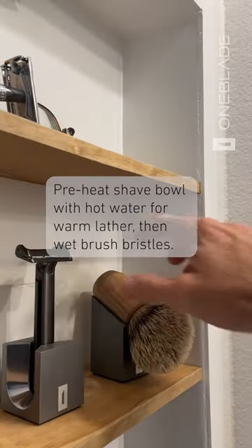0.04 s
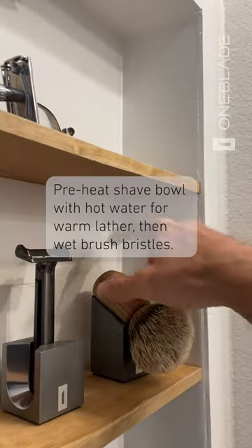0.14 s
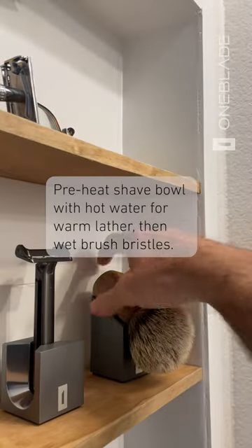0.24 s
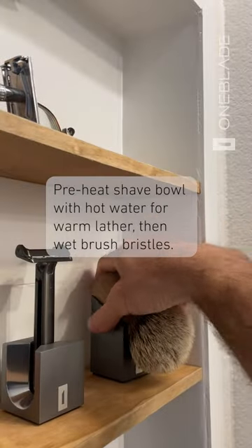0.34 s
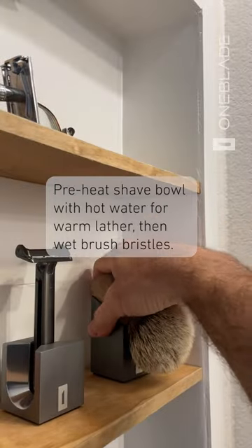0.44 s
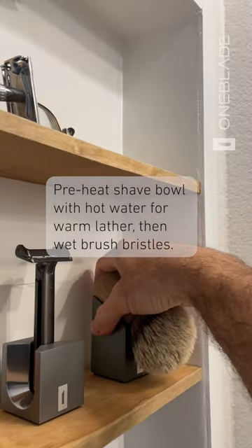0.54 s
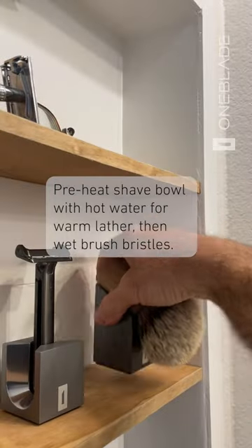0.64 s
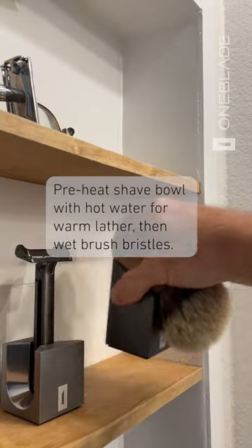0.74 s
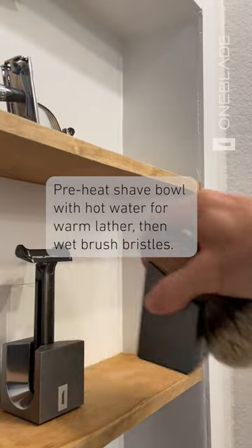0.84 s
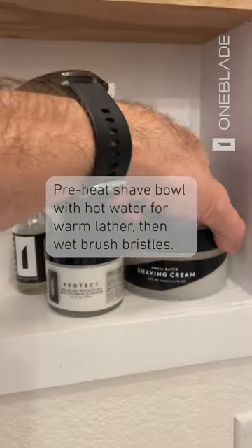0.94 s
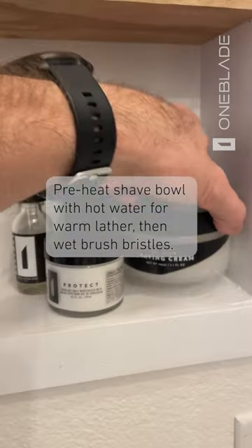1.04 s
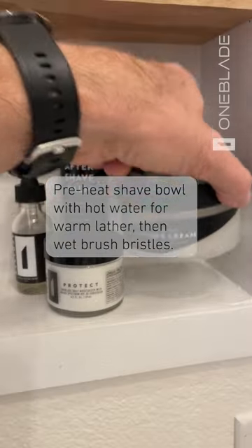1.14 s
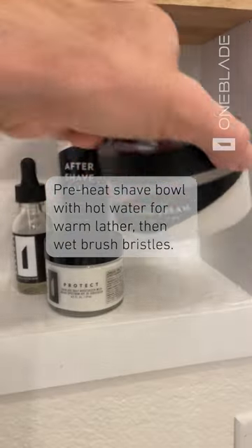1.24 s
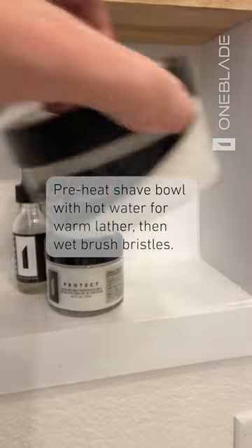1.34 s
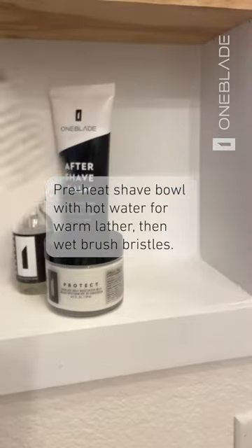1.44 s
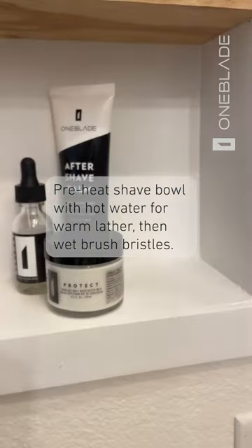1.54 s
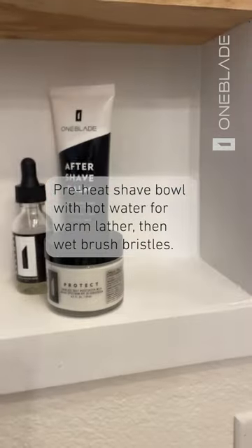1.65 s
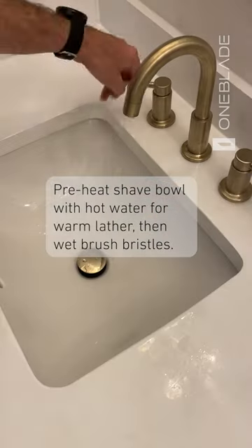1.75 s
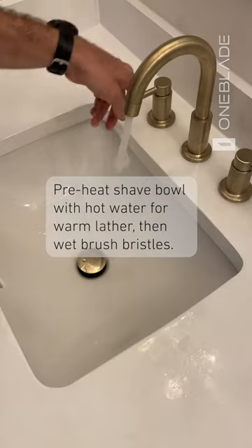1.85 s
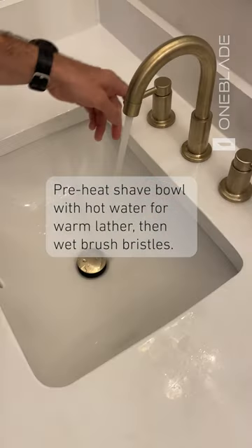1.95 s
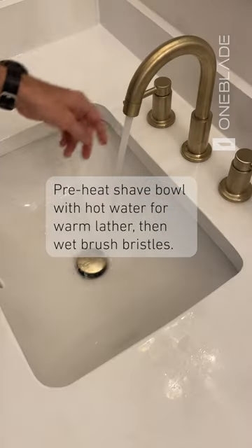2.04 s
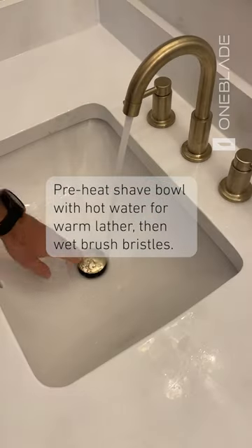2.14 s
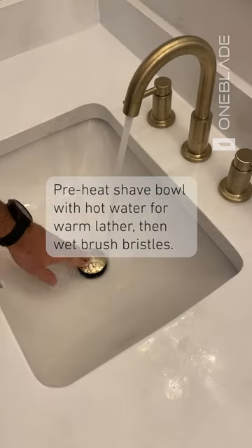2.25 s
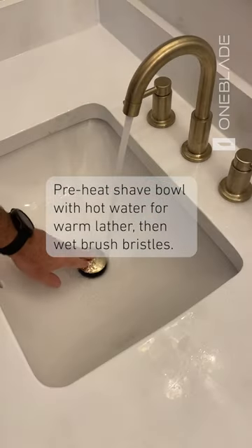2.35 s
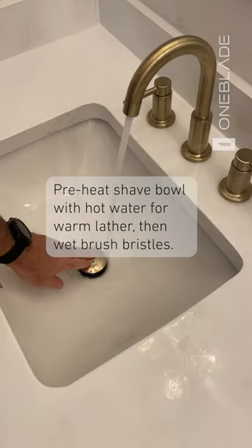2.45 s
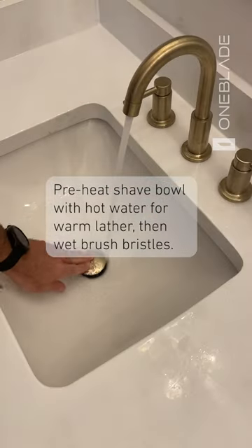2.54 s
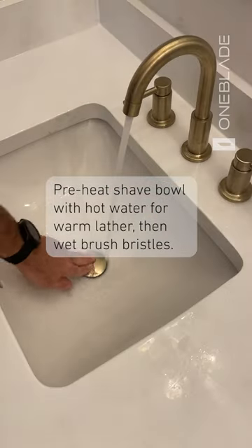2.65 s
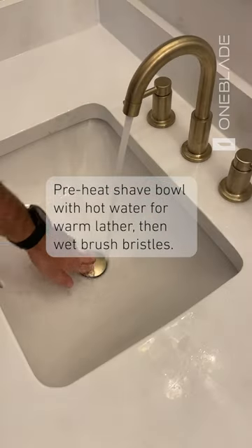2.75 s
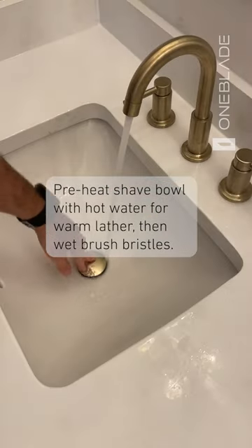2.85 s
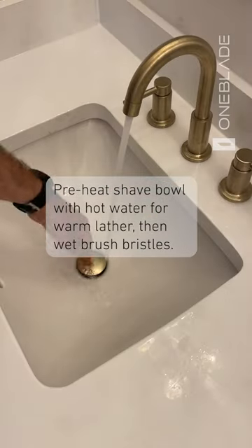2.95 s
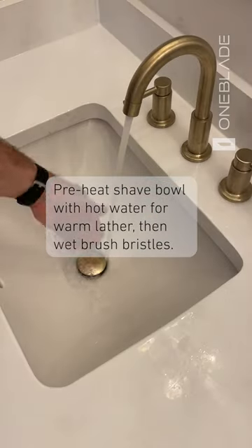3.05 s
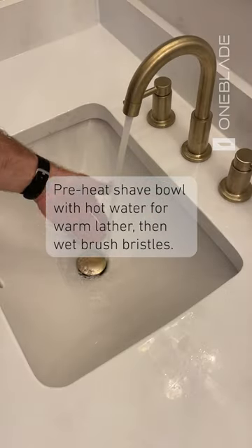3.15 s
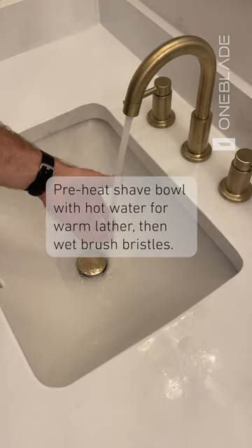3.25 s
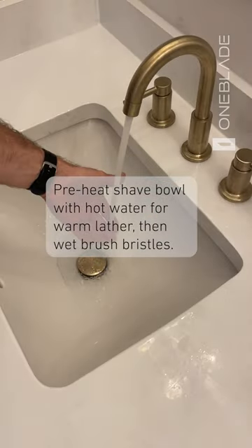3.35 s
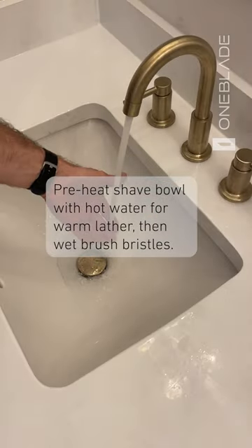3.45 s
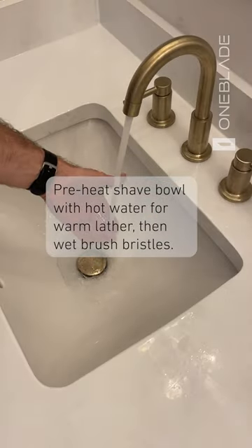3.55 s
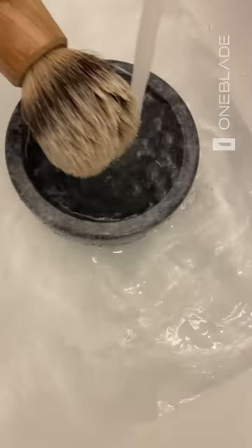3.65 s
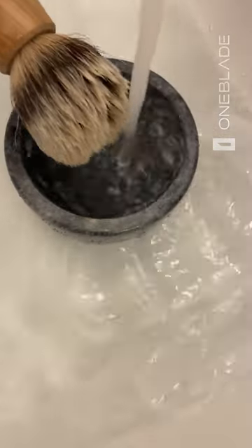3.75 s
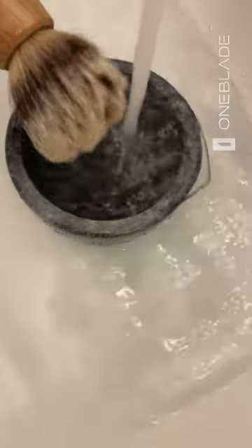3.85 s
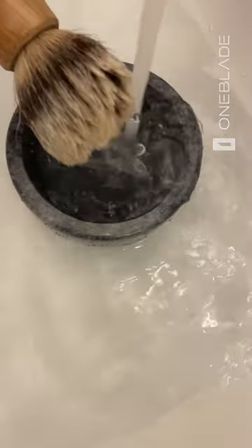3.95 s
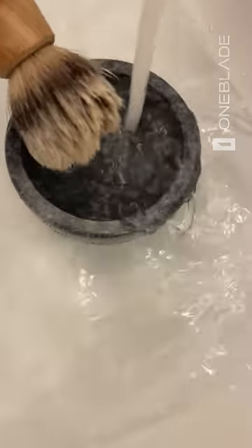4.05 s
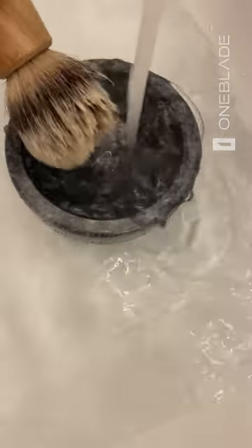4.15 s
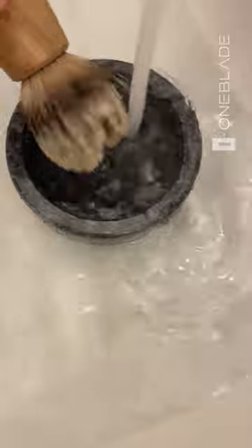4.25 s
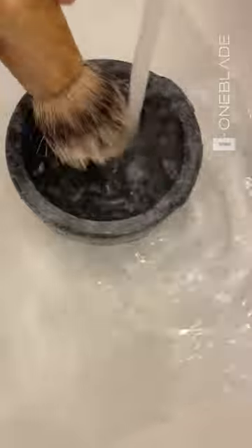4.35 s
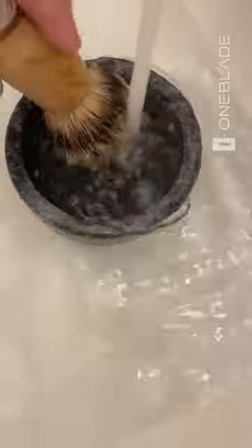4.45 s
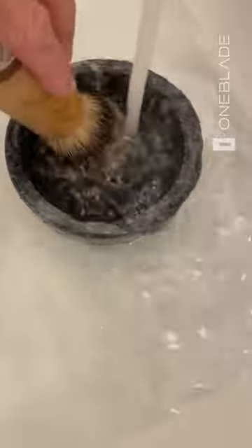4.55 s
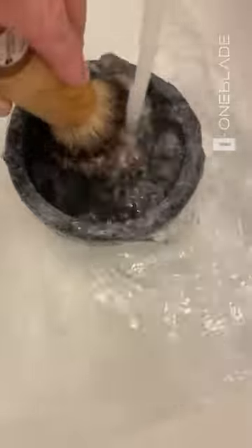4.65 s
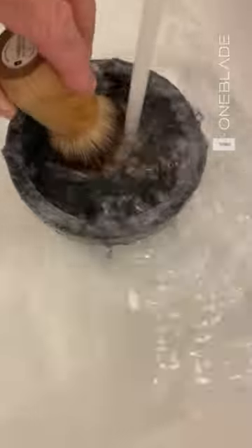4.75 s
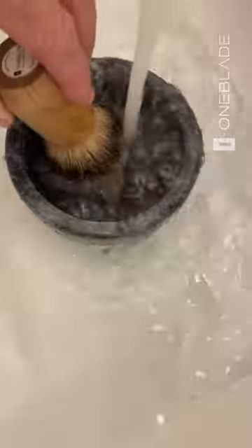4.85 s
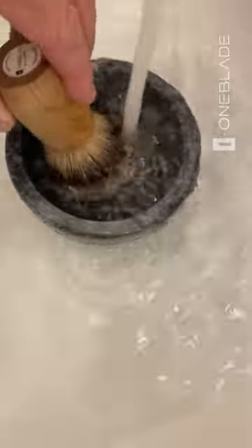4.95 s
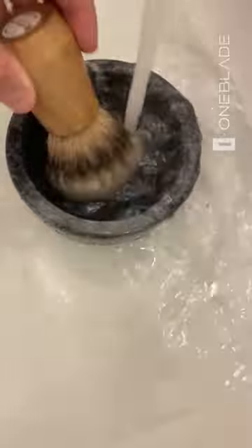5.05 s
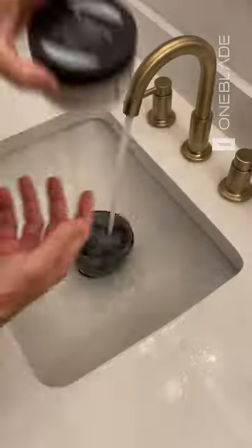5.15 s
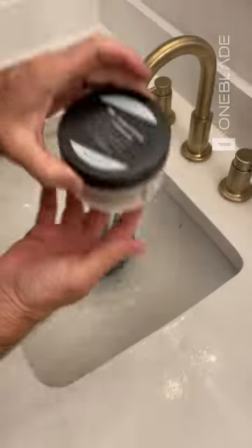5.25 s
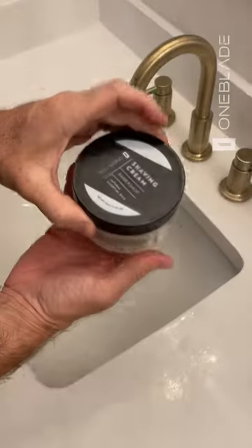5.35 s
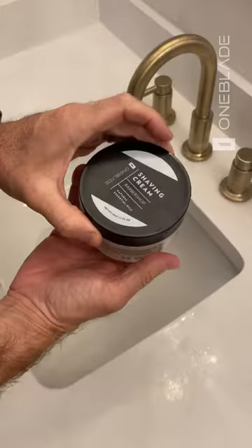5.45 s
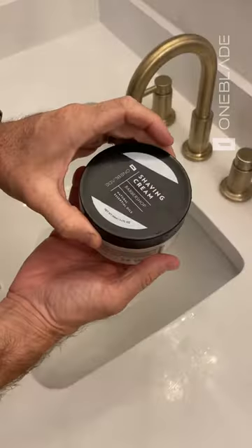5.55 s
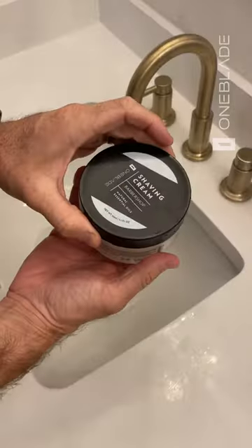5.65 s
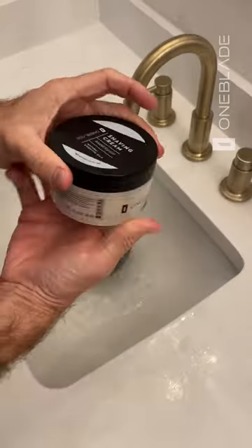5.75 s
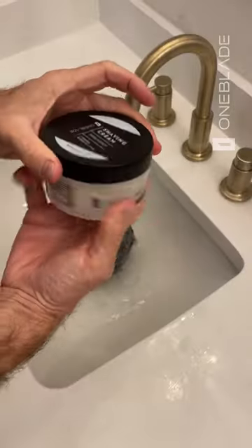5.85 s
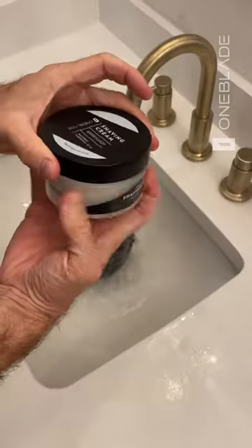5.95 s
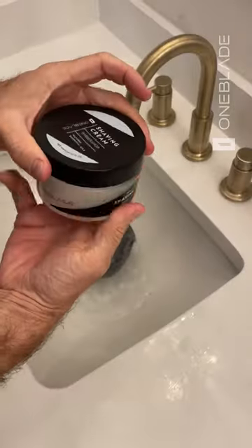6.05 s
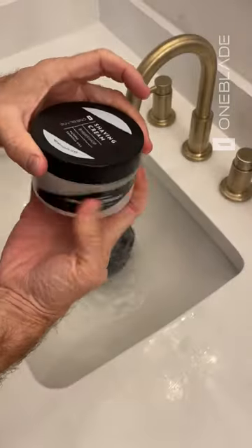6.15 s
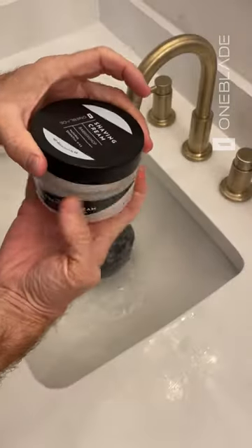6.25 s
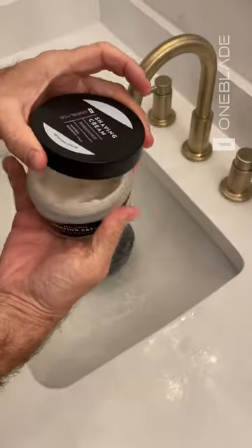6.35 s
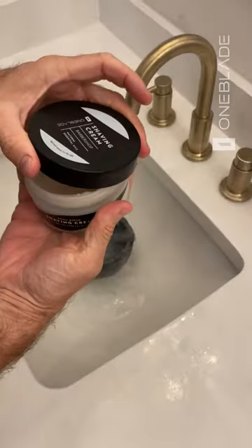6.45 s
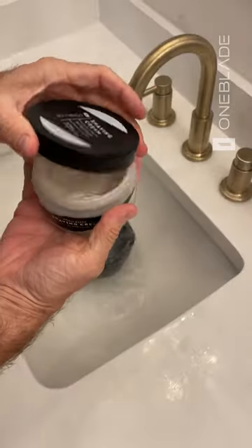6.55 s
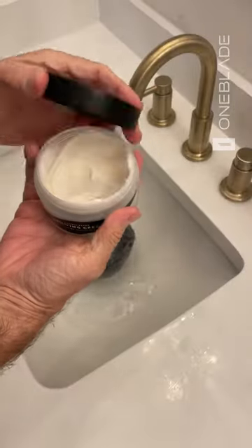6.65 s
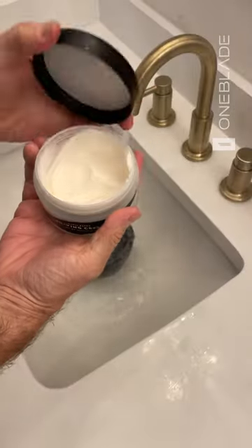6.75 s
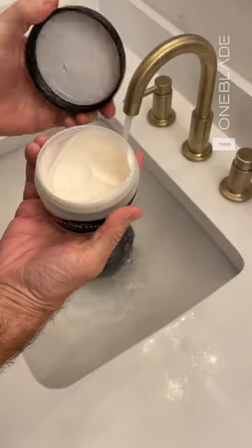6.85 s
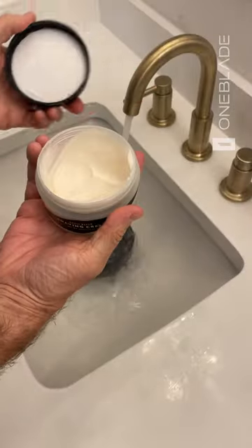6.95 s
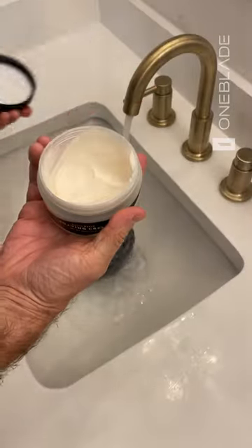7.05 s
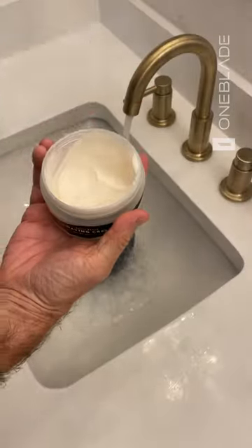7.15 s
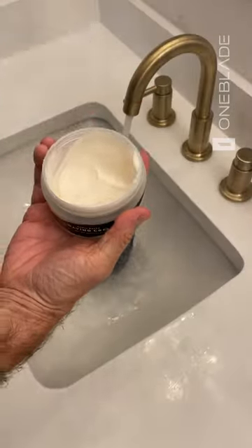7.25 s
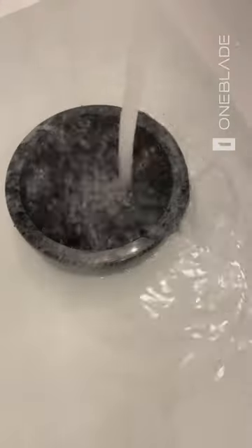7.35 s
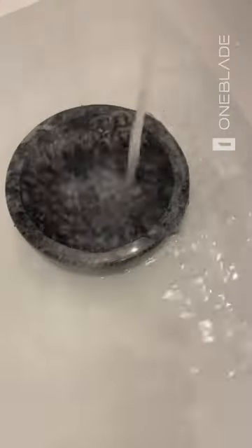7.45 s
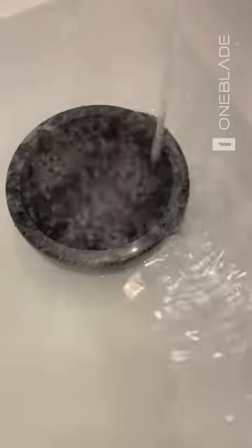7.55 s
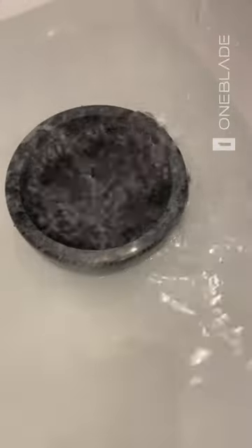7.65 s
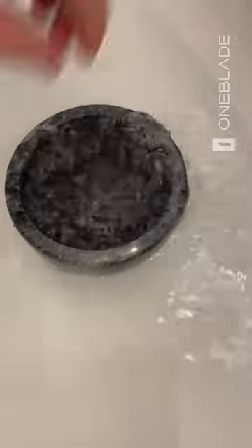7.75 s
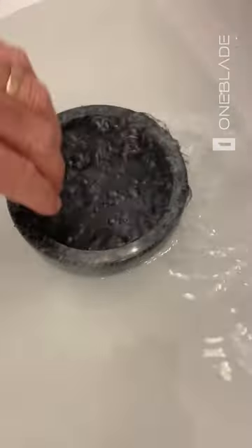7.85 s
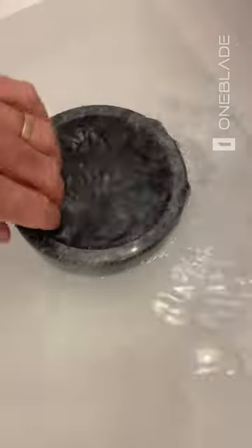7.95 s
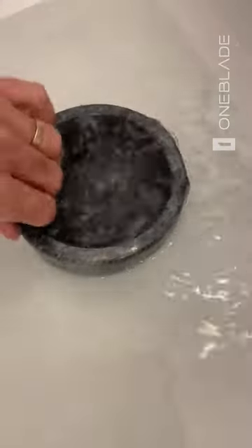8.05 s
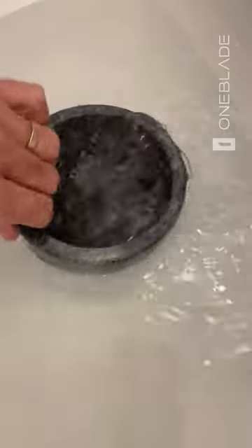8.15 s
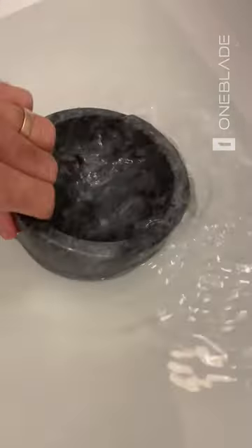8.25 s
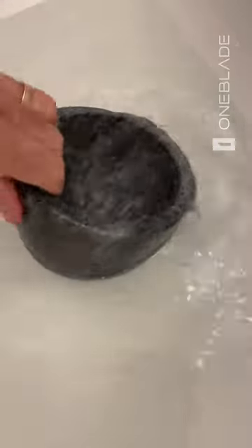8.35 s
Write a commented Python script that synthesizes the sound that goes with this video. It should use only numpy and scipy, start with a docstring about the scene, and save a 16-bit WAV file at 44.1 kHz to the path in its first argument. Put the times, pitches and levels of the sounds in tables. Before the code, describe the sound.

Wooden knocks and brief friction scrapes on a shelf, then a tap opens, splashing on porcelain, gurgling in a stone bowl, shutting to drips and a grinding drag.

```python
"""Bathroom shelf, tap and stone bowl

A brush stand and a jar are slid off their shelves as filtered noise strokes and struck modes; a tap opens over
a porcelain basin, its jet noise and random bubbles first on porcelain, then a hand, then in a stone bowl.
The drain stopper is pushed as modal thuds, the valve shuts, last drops fall as noise bursts and the bowl
is dragged in two noise bands. The stereo image wavers in phase, with wall echoes and a low room rumble."""
import sys
import numpy as np
from scipy import signal
from scipy.fft import rfft, irfft
from scipy.io import wavfile
from scipy.ndimage import uniform_filter1d

SR = 44100
rng = np.random.default_rng(int(sys.argv[2]) if len(sys.argv) > 2 else 0)


def wav_record(signal):
    """Record a signal, one row per channel, as 16-bit PCM in the file named by sys.argv[1]."""
    frames = np.transpose(np.atleast_2d(signal))
    bounded = np.clip(frames, -1, 1)
    # unit amplitude maps onto the largest positive 16-bit level
    quanta = np.round(bounded * 32767).astype(np.int16)
    wavfile.write(sys.argv[1], SR, quanta)


N = 370881


def gain_of(db):
    """Amplitude factor of a level in dB."""
    return 10 ** (np.asarray(db) / 20)


def evened(x):
    """Scales to rms 1."""
    return x / np.sqrt(np.mean(x ** 2) + 1e-20)


def read(points, hz):
    """Interpolates a (frequency, value) curve over log frequency."""
    f, value = np.transpose(points)
    return np.interp(np.log(hz + 1), np.log(f + 1), value)


def follow(rows, axis, outside=-150):
    """One column of a time curve at every sample."""
    rows = np.array(rows)
    return np.interp(np.arange(N) / SR, rows[:, 0], rows[:, axis], outside, outside)


def add(mix, s, sound):
    """Adds a sound in place at s seconds."""
    part = mix[round(s * SR):][:len(sound)]
    part += sound[:len(part)]


def wander(size):
    """Slow random drift of rms 1: noise averaged twice over size samples."""
    return evened(uniform_filter1d(uniform_filter1d(rng.standard_normal(N), size), size))


def noise(colour_db, size, patchy_db, flicker_db):
    """Random short-time spectra with drifting patches and a flicker shared by all bins; rms 1."""
    frames, bins = 4 * N // size + 5, size // 2 + 1
    real, imag, patches = rng.standard_normal((frames, bins, 3)).T
    patches = uniform_filter1d(patches, size=size // 128 + 2, axis=0)
    patches = evened(uniform_filter1d(patches, size=8, axis=1))
    colour = colour_db(np.fft.rfftfreq(size, 1 / SR))[:, None]
    db = colour + patchy_db * patches + flicker_db * rng.standard_normal(frames)
    spectra = (real + 1j * imag) * gain_of(db)
    return evened(signal.istft(spectra, nperseg=size, noverlap=3 * size // 4)[1][:N])


def tilted(x, tilt, pivot_hz):
    """Turns the spectrum about a pivot by roughly tilt dB per octave, given at every sample."""
    hz, t, z = signal.stft(x, SR, nperseg=256)
    tilt_db = np.interp(t, np.arange(N) / SR, tilt) * np.log2((hz[:, None] + 100) / pivot_hz)
    return signal.istft(z * gain_of(tilt_db), SR, nperseg=256)[1][:N]


def humps(peaks, hz):
    """Summed power of resonances, as a gain."""
    return np.sqrt(sum(gain_of(2 * db) / (1 + (2 * (hz - f) / w) ** 2) for f, w, db in peaks))


def resonate(x, peaks, floor):
    """Passes x through resonances over a flat gain floor; rms 1."""
    gain = floor + humps(peaks, np.fft.rfftfreq(N, 1 / SR))
    return evened(irfft(rfft(x) * gain, N))


def bubble(hz, cycles, rise, swell=0.42):
    """An air pocket swells, rings with climbing pitch and dies; scaled by its rms."""
    u = np.arange(int(3 * cycles / hz * SR)) * hz / SR / cycles
    ring = np.sin(2 * np.pi * cycles * u * (1 + rise * u))
    return evened(ring * u ** swell * np.exp(-2.5 * u)) / 4.7


def grains(low_hz, high_hz, cycles, per_s, spread_db, count=44):
    """Many bubbles of random size, damping and strength; rms 1."""
    out, (when, kind) = np.zeros(N), rng.random((N, 2)).T
    strength = gain_of(spread_db * np.minimum(rng.exponential(1, N), 5))
    clicks = strength * (when < per_s / SR)
    for k, hz in enumerate(np.geomspace(low_hz, high_hz, count)):
        chosen = clicks * ((kind * count).astype(int) == k)
        ring = bubble(hz, cycles * rng.uniform(0.57, 1.58), rise=0.049)
        out += signal.oaconvolve(chosen, ring)[:N]
    return evened(out)


def thuds(blows, modes, rattle):
    """A half-sine blow and a dying rattle ring the modes of a body, with a short crack of noise."""
    out, t = np.zeros(N), np.arange(SR // 2) / SR
    for (s, db, length_s, crack_db), chance in zip(blows, rng.standard_normal((len(blows), len(t)))):
        ring = sum(gain_of(d - 60 * t / t60) * np.sin(2 * np.pi * hz * t) for hz, d, t60 in modes)
        blow = np.sin(np.linspace(0, np.pi, int(length_s * SR) + 3))
        push = rattle * chance * gain_of(-60 * t / 0.084) + (t == 0)
        ring = signal.oaconvolve(signal.oaconvolve(ring, blow), push)[:len(t)]
        crack = uniform_filter1d(chance, size=8) * gain_of(crack_db - 60 * t / 0.086)
        add(out, s, gain_of(db) * (ring / abs(ring).max() + crack))
    return out


# Room rumble level: (time [s], level [dB])
RUMBLE_LEVEL = [(0.0, -32.5), (1.08, -33.5), (1.2, -36.5), (1.94, -33.5), (2.1, -38.5), (2.8, -40),
                (3.05, -38.5), (3.55, -40), (3.65, -33), (5.15, -34), (5.4, -37.5), (6.45, -36), (7.3, -35),
                (7.52, -28.5), (7.94, -38.5), (8.15, -43), (8.25, -27.5), (8.41, -30)]
# Room air spectrum: (frequency [Hz], relative density [dB])
AIR_SPECTRUM = [(20, -35), (40, -21), (66, 13.5), (85, 5.5), (100, 8), (135, -0.5), (165, -9), (220, -5),
                (480, -27.5), (1200, -42), (3000, -47), (9000, -49), (16000, -67)]


def rumble():
    """Lumpy low air noise of the room."""
    air = noise(lambda hz: read(AIR_SPECTRUM, hz), size=2048, patchy_db=2.5, flicker_db=1.0)
    return gain_of(follow(RUMBLE_LEVEL, axis=1, outside=-40)) * air


# Strokes over a shelf: (start [s], length [s], start level [dB], end level [dB], release [dB/s],
# brightness [dB/octave])
STROKES = [(0.289, 0.024, -45, -24, -360, -0.5), (0.52, 0.025, -58, -57, -400, -3.5),
           (0.914, 0.082, -47, -41, -900, 0), (1.02, 0.4, -65, -68, -150, 0.5),
           (1.517, 0.3, -96, -67, -300, 12)]
# Rubbing spectrum: (frequency [Hz], relative density [dB])
RUB_SPECTRUM = [(200, -24), (350, 1.5), (1200, 0), (1800, -8), (3000, -8.5), (6500, -10.5), (9000, -18),
                (11000, -21), (15600, -26)]
# Resonances of the rubbed jar: (frequency [Hz], width [Hz], level [dB])
JAR_RESONANCES = [(1070, 40, 1), (1980, 88, 0), (3180, 120, 1), (5820, 100, -22)]
# Jar foot scuffing the shelf edge: (frequency [Hz], width [Hz], level [dB])
SCUFF_RESONANCES = [(1610, 200, -7), (1980, 110, -3), (2590, 60, -7), (2880, 80, -9), (4000, 70, -11),
                    (4660, 20, -11)]
JAR_FROM_S, SCUFF_FROM_S = 0.8, 1.013  # earlier strokes move the brush stand
SLIDE_ATTACK_S, DULLING_DB_PER_OCTAVE_PER_S = 0.0022, -35


def slides():
    """Dry friction noise: each stroke has a quick attack, a push, and a tail that fades and dulls."""
    stand = noise(lambda hz: read(RUB_SPECTRUM, hz), size=512, patchy_db=3.5, flicker_db=3.5)
    jar = resonate(stand, JAR_RESONANCES, floor=0.32)
    scuff = resonate(stand, SCUFF_RESONANCES, floor=0.15)
    body = np.searchsorted([JAR_FROM_S * SR, SCUFF_FROM_S * SR], np.arange(N))
    rub = np.choose(body, [stand, jar, scuff])
    t, level, tilt = np.arange(N) / SR, np.zeros(N), np.zeros(N)
    for s, length_s, from_db, to_db, release_db, bright in STROKES:
        after_s = np.maximum(t - s - length_s, 0)
        db = np.interp(t, [s, s + length_s], [from_db, to_db]) + release_db * after_s
        level += gain_of(db) * np.clip((t - s) / SLIDE_ATTACK_S, 0, 1)
        stroke_tilt = np.maximum(bright + DULLING_DB_PER_OCTAVE_PER_S * after_s, -12)
        tilt = np.where(t > s - SLIDE_ATTACK_S, stroke_tilt, tilt)
    return level * tilted(rub, tilt, pivot_hz=1510)


# Rocking of the grasped stand: (time [s], ring peak [dB], blow length [s], crack re ring [dB])
STAND_BLOWS = [(.303, -17, 0.00036, -20), (.315, -10.5, 0.00034, -26), (.346, -30, 0.00043, -6),
               (.365, -20.5, 0.00046, -7)]
# Modes of the brush stand on its wooden shelf: (frequency [Hz], level [dB], t60 [s])
STAND_MODES = [(317.6, -0.5, 0.2), (477, -6, 0.12), (590, 3, 0.05), (710, 10, 0.048), (877, 8, 0.055),
               (1050, 6, 0.05), (1380, -10, 0.08), (1750, -2, 0.07), (2300, 1, .08), (2740, 0, 0.09),
               (3580, -5, .1)]


def stand_tips():
    """The grasped brush stand rocks: short blows ring its modes."""
    return thuds(STAND_BLOWS, STAND_MODES, rattle=0.035)


# Low thump as the water section begins, then handle turns:
# (time [s], ring peak [dB], blow length [s], crack re ring [dB])
VALVE_BLOWS = [(1.735, -12, 0.002, -14), (1.768, -16, 0.003, -28), (1.829, -9, 0.0004, -10),
               (1.8432, -7, 0.0022, -21), (1.865, -15, 0.003, -35), (1.908, -16, 0.009, -43),
               (7.408, -10, 0.0035, -23), (7.482, -13, 0.0038, -30), (7.503, -15, .002, -25),
               (7.533, -18, 0.003, -30)]
# Modes of the pipe: (frequency [Hz], level [dB], t60 [s])
PIPE_MODES = [(66, -2, 0.3), (91.5, 2, 0.25), (136, 13, 0.2), (185, 2, 0.12), (240, -2, .07),
              (340, -5, 0.09), (409, -3, .11), (463, -5, 0.1), (527, 13, 0.045), (620, -5, .08),
              (870, 7, .05)]


def valve_knocks():
    """A low thump, then handle turns, as blows that ring the pipe modes."""
    return thuds(VALVE_BLOWS, PIPE_MODES, rattle=0.015)


# Water landing: tap opening, bare porcelain, hand, bowl near, bowl farther off, dribble.
# (start [s], hiss [dB, +10 dB in jet()], spray [dB], gurgle [dB], slosh [dB],
# hiss tilt [dB/octave], pipe hum [dB])
LANDINGS = [(1.735, -26, -35, -33.5, -53, -0.5, -62), (1.974, -25.5, -15.5, -34.5, -37.5, 1, -49),
            (3.101, -25, -19.5, -30.5, -53, 0.5, -49), (3.616, -24.5, -35.5, -25, -30, -1, -40.5),
            (5.174, -29.5, -51, -29, -38, -1, -37), (7.409, -28, -28.5, -58, -31, -3, -34)]


def landing(column):
    """One column of the landing stages at every sample, with short crossfades."""
    rows = np.array(LANDINGS)
    index = np.maximum(np.searchsorted(rows[:, 0], np.arange(N) / SR) - 1, 0)
    return uniform_filter1d(rows[index, column], size=200)


# Valve opening: (time [s], flow level [dB])
VALVE_FLOW = [(1.735, -35), (1.787, -18), (1.813, -4.5), (1.88, -0.5), (7.3, 1.5), (7.34, 6.5), (7.4, -0.5),
              (7.5, -5), (7.73, -12), (7.92, -13.5), (8.01, -20.5), (8.16, -24.5)]


def flow_db():
    """Flow level at every sample; -300 dB outside the curve."""
    return follow(VALVE_FLOW, axis=1, outside=-300)


def layer_gain(column, flow_share, drift_db, extra_db=0):
    """Water-layer gain: landing level, share of the flow change, and random drift."""
    drift = drift_db * wander(int(0.045 * SR))
    return gain_of(landing(column) + flow_share * flow_db() + extra_db + drift)


# Lower jet spectrum: (frequency [Hz], relative density [dB])
JET_SPECTRUM = [(250, -18.5), (800, -12.5), (1100, -7.5), (1700, -21.5), (2400, -3.5), (4000, -8.5)]
# Upper jet spectrum: (frequency [Hz], relative density [dB])
FIZZ_SPECTRUM = [(6200, -3.5), (7400, -1.5), (9000, -1.5), (11500, -4.5), (12600, -5), (14300, -2),
                 (15600, -2)]


def jet():
    """Hiss of the aerated jet: flickering noise with a tilt set by the landing."""
    spectrum = JET_SPECTRUM + FIZZ_SPECTRUM
    hiss = noise(lambda hz: read(spectrum, hz), size=256, patchy_db=0.0, flicker_db=1.5)
    hiss = tilted(gain_of(10.0) * hiss, landing(5), pivot_hz=8800)
    return layer_gain(1, flow_share=1, drift_db=0.76) * hiss


# Favoured bubble sizes in the film: (frequency [Hz], width [Hz], level [dB])
FILM_RESONANCES = [(3630, 730, 1.5), (4300, 180, -13), (5000, 120, -3)]
# Spray while a hand works under the jet: (time [s], level change [dB], tilt [dB/octave])
HAND_SPLASH = [(1.97, 1, 6), (2.0, -7, 11), (2.06, -7.5, 22), (2.17, 0.5, 1), (2.45, 0, 2.5),
               (2.52, 2.5, 7), (2.7, -6.5, 19), (2.84, -2.5, 21), (2.94, -2.5, -1), (2.98, -5.5, 10),
               (3.12, 0, 6), (3.25, 3, 7), (3.37, -5, 9), (3.61, 1, 8)]
SPRAY_EDGE_HZ = 3280  # the thin film on the porcelain makes no larger bubbles


def spray():
    """Small bubbles in a thin film: high-passed grains, shaped as a hand works under the jet."""
    film = grains(low_hz=3335, high_hz=7150, cycles=7.3, per_s=4000, spread_db=3.8)
    film = signal.sosfilt(signal.butter(8, SPRAY_EDGE_HZ, "high", fs=SR, output="sos"), film)
    film = resonate(film, FILM_RESONANCES, floor=1.0)
    film = tilted(film, follow(HAND_SPLASH, axis=2, outside=0), pivot_hz=4600)
    splash_db = follow(HAND_SPLASH, axis=1, outside=0)
    return layer_gain(2, flow_share=1, drift_db=1.2, extra_db=splash_db) * film


def gurgle():
    """Dense mid-pitched bubbles that follow only part of the flow change."""
    bubbling = grains(low_hz=1399, high_hz=3910, cycles=7.4, per_s=1500, spread_db=3.5)
    return layer_gain(3, flow_share=0.35, drift_db=1.35) * bubbling


# Air in bowl and basin: (frequency [Hz], width [Hz], level [dB])
HOLLOW_RESONANCES = [(232, 29, 2.5), (325, 23, 3.5), (407, 51, -1), (475, 58, 3.5), (585, 24, 6.5),
                     (800, 380, 0.5)]
# Heaves of the water: (time [s], slosh level change [dB])
WATER_HEAVES = [(3.7, 12.5), (2.5, 6), (4.07, 4), (4.28, 6.5), (2.85, 6), (4.22, 4), (4.55, -10), (4.74, 1),
                (5.15, 7), (5.97, 11), (6.15, 12)]
HEAVE_S = 0.032


def slosh():
    """Large bubbles ring the air in bowl and basin; heaves change their level."""
    t = np.arange(N) / SR
    heaves_db = sum(db * np.exp(-((t - s) / HEAVE_S) ** 2) for s, db in WATER_HEAVES)
    large = grains(low_hz=255, high_hz=884, cycles=3.6, per_s=600, spread_db=4.06)
    hollow = resonate(large, HOLLOW_RESONANCES, floor=0.21)
    return layer_gain(4, flow_share=1, drift_db=2.7, extra_db=heaves_db) * hollow


# Pipe hum resonances, squared in use: (frequency [Hz], width before squaring [Hz],
# level before squaring [dB])
DRONE_RESONANCES = [(135.6, 16, 1.5), (183.6, 23, -1)]


def pipe_hum():
    """Running water hums in the pipe: noise through squared resonances."""
    hum = noise(lambda hz: 40 * np.log10(humps(DRONE_RESONANCES, hz)), size=4096, patchy_db=1.5, flicker_db=1.0)
    return gain_of(landing(6) + flow_db()) * hum


# Drops on the surface: (time [s], burst peak [dB], frequency [Hz], tick level before scaling [dB])
DROP_HITS = [(1.974, 1, 4460, -3), (1.981, -7, 4300, -8), (1.987, -5, 5000, -12), (7.417, -8, 5600, -14),
             (7.448, -7, 2980, -9), (7.456, -7, 4000, -12), (7.475, -2, 3630, -1), (7.484, -8, 3900, -4),
             (7.488, -6, 4130, -11), (7.506, -6, 3380, -12), (7.509, -10, 4600, -15), (7.556, -4, 5900, -6),
             (7.5795, -1, 6000, -9), (7.622, -4, 3980, 8), (7.626, -9, 6150, -9), (7.655, -14, 4660, -11),
             (7.668, 3, 11300, 10), (7.675, -19, 6000, -18), (7.702, -4, 2800, 0), (7.723, -7, 10700, -12),
             (7.725, -10, 4900, -20), (7.758, -15, 1600, -19), (7.761, -0.5, 6060, -28),
             (7.7701, 0, 4970, -33), (7.893, -4, 2630, -13), (7.981, -14, 2400, -18),
             (7.9534, -3.5, 10300, 9), (7.958, -2, 10000, 2), (7.983, 1.5, 8900, 3),
             (8.028, -3.5, 6300, -28), (8.058, -10.5, 6630, -17), (8.079, -23, 10300, -24),
             (8.127, -27, 4200, -16), (8.198, -23, 3580, 11), (8.223, -11, 6000, -1.5)]
DROP_FADE_T60_S, TICK_T60_S, DROP_ATTACK_S = 0.012, 0.0079, 0.00011


def drops():
    """Drops tick on the surface: narrow noise bursts with a sharp broadband tick."""
    out, t = np.zeros(N), np.arange(2000) / SR
    for (s, db, hz, tick_db), hiss in zip(DROP_HITS, rng.standard_normal((len(DROP_HITS), 2000))):
        tick = np.diff(hiss, n=2, prepend=[0, 0]) * gain_of(tick_db - 60 * t / TICK_T60_S)
        band = signal.iirpeak(hz, 2.6, SR)
        ring = signal.lfilter(*band, signal.lfilter(*band, hiss))
        ring = ring * gain_of(-60 * t / DROP_FADE_T60_S) * np.minimum(t / DROP_ATTACK_S, 1)
        burst = tick + 3 * ring
        add(out, s, gain_of(db) * burst / abs(burst).max())
    return out


# Pushes on the drain stopper: (time [s], ring peak [dB], blow length [s], crack re ring [dB])
STOPPER_BLOWS = [(2.603, -21, 0.0021, 11.5), (2.613, -24.5, 0.0007, 20.5), (2.625, -21, 0.0024, -1),
                 (2.629, -12, 0.0052, -20), (2.69, -17, 0.011, -30), (2.955, 5.5, 0.00026, -9.5),
                 (2.964, 1, 0.0017, -26), (3.04, -12, 0.0021, -30)]
# Modes of the basin: (frequency [Hz], level [dB], t60 [s])
BASIN_MODES = [(76, -2, 0.35), (122, 3, 0.17), (160, 2, 0.2), (205, -5, 0.25), (240, -3, 0.07),
               (288, 5, 0.14), (316, -1, 0.12), (410, -6, 0.1), (472, -2, 0.08), (500, -3, 0.07),
               (560, -9, 0.1), (700, -1, 0.08)]


def stopper_pushes():
    """Pushes on the drain stopper ring the modes of the basin."""
    return thuds(STOPPER_BLOWS, BASIN_MODES, rattle=0.02)


# Single loud bubbles: (time [s], relative level [dB], frequency [Hz], damping length [cycles, min 1.5])
LOUD_BUBBLES = [(2.652, -20, 298, 14), (2.782, -33, 1000, 9), (2.79, -35, 342, 9.2), (2.841, -26, 980, 5),
                (2.897, -22, 920, 4.6), (3.646, -28, 320, 7), (3.69, -21, 343, 5.7), (3.695, -3.5, 1920, 5),
                (3.709, -16, 325, 4.5), (3.848, -9.5, 2200, 8.4), (3.865, -4.5, 1910, 4.9),
                (3.92, -10.5, 1710, 11), (3.96, -8, 2280, 21), (4.01, -13, 2230, 8), (4.027, -17, 418, 4),
                (4.052, -3.5, 437, 1.5), (4.067, -1, 2330, 4.6), (4.068, -8, 1770, 8.2),
                (4.088, -14, 2450, 6), (4.09, -18, 320, 6), (4.113, -16, 458, 4.5),
                (4.157, -12.5, 1720, 8.9), (4.2, -16, 327, 4.1), (4.258, -14, 333, 3.6),
                (4.293, -21, 480, 2.1), (4.392, -6.5, 1360, 4.1), (4.446, -13, 3060, 9.9),
                (4.495, -20, 340, 3.6), (4.534, -17.5, 304, 4.9), (4.704, -17, 348, 6),
                (4.724, -20.5, 395, 7.2), (4.749, -20, 348, 4.7), (4.767, -15, 624, 5.6),
                (4.779, -4.5, 1080, 4.3), (4.795, -9, 1880, 6), (4.94, -16.5, 308, 4.6),
                (4.979, -17, 370, 4.3), (4.985, -16, 750, 7.4), (4.998, -8, 2360, 9.6),
                (5.078, -12, 2230, 16), (5.122, -13.5, 337, 3.4), (5.152, -22, 330, 3.4),
                (5.155, -18.5, 600, 9.3), (5.372, -10.5, 1580, 3.1), (5.396, -23, 468, 5.9),
                (5.428, -14.5, 1370, 7), (5.518, -16, 1310, 5), (5.554, -20, 1610, 8.1),
                (5.629, -19, 1610, 8.8), (5.738, -9.5, 1810, 6.7), (5.738, -8.5, 3530, 12),
                (5.915, -13.5, 3620, 16), (5.98, -14, 1700, 9), (5.943, -1, 374, 1.2),
                (6.001, -16, 1150, 5.5), (6.018, -8.5, 1210, 4.1), (6.074, -13, 1310, 3.5),
                (6.104, -6, 1560, 7.2), (6.134, -10.5, 1180, 9.6), (6.176, -2.5, 1230, 2.4),
                (6.212, -15, 1630, 8.4), (6.231, -17, 586, 4.4), (6.265, -15.5, 664, 5.3),
                (6.316, -3.5, 1510, 1.7), (6.354, -18, 1670, 5.5), (6.401, -13, 2300, 5.5),
                (6.414, -15.5, 646, 4.9), (6.433, -9, 1750, 2.5), (6.6, -9.5, 1500, 3.7),
                (6.834, -16.5, 1600, 15), (6.881, -15, 1740, 7.8), (6.922, -12, 2180, 6),
                (7.036, -5.5, 2100, 4.1), (7.043, -4, 1890, 2.4), (7.081, -7, 1760, 14),
                (7.159, -18.5, 1310, 14), (7.351, -18, 1730, 27), (7.447, -16, 2240, 13),
                (7.448, -19, 806, 1.6), (7.473, -14, 503, 2.5), (7.504, -10.5, 515, 1.5),
                (7.54, -24, 452, 5.5), (7.578, -19, 454, 4.6), (7.579, -16.5, 920, 6.2),
                (7.608, -18, 1980, 7.1), (7.624, -17.5, 448, 7.1), (7.642, -13, 1860, 8.3),
                (7.647, -20, 304, 3.3), (7.721, -15.5, 984, 10), (7.734, -21, 1110, 8.8),
                (7.757, -14.5, 550, 4.5), (7.776, -30.5, 554, 40), (7.893, -1, 1000, 1.2),
                (7.896, -15, 718, 9.9), (7.9048, -8.5, 1165, 4), (7.92, -7, 768, 4.4),
                (7.929, -18, 856, 13), (7.981, -13.5, 1080, 6.7), (8.005, -19, 800, 7.4),
                (8.023, -1.5, 1880, 4.4), (8.021, -13.5, 1225, 9.8), (8.031, -34, 1930, 9.1)]
STEADY_FROM_S, STEADY_TO_S = 3.6, 7.79  # short, steady bubbles between; slower, climbing ones outside
STEADY_RISE, STEADY_SWELL = 0.037, 0.42  # rise: pitch climbs by twice this share per damping length
CLIMB_RISE, CLIMB_SWELL = 0.14, 1.3


def single_bubbles():
    """Single air pockets ring, each followed by a weaker, lower ring."""
    out = np.zeros(N)
    for s, db, hz, cycles in LOUD_BUBBLES:
        steady = STEADY_FROM_S < s < STEADY_TO_S
        rise, swell = (STEADY_RISE, STEADY_SWELL) if steady else (CLIMB_RISE, CLIMB_SWELL)
        add(out, s, gain_of(db) * bubble(hz, max(cycles, 1.5), rise, swell))
        add(out, s + 0.012, gain_of(db - 26.5) * bubble(hz * 0.82, 2 * cycles, rise / 2))
    return out


DRIBBLE_DB = -26.5  # at 0 dB flow


def dribble():
    """Bubbles under the broken jet, from the last landing stage on."""
    bubbling = grains(low_hz=1620, high_hz=2620, cycles=7.8, per_s=900, spread_db=3.4, count=8)
    broken = np.arange(N) / SR > LANDINGS[-1][0]
    return broken * gain_of(DRIBBLE_DB + flow_db()) * bubbling


# Bowl over the basin floor: (time [s], groan level [dB], grit level [dB])
DRAG_LEVELS = [(8.14, -66, -63), (8.166, -28, -46.5), (8.236, -33.5, -40), (8.352, -32, -31.5),
               (8.384, -31, -41), (8.396, -38, -54), (8.41, -39, -54)]
# Groan spectrum: (frequency [Hz], relative density [dB])
GROAN_SPECTRUM = [(88, -14), (150, 6), (258, -6), (290, 6), (409, 2.5), (561, -36), (703, -8), (1300, -27),
                  (1690, -39), (2860, -120)]
# Grit spectrum: (frequency [Hz], relative density [dB])
GRIT_SPECTRUM = [(800, -12.5), (1000, -8.5), (1450, -5), (2030, -14), (2300, -0.5), (2710, -18),
                 (3710, -11.5), (4520, -20), (6100, -14.5), (7400, -19), (9000, -28), (12000, -39),
                 (15600, -42)]


def drag():
    """Wet stone groans and grinds over porcelain: a low and a high noise band."""
    groan = noise(lambda hz: read(GROAN_SPECTRUM, hz), size=1024, patchy_db=0.8, flicker_db=0.4)
    grit = noise(lambda hz: read(GRIT_SPECTRUM, hz), size=512, patchy_db=0.5, flicker_db=-5.5)
    return gain_of(follow(DRAG_LEVELS, axis=1)) * groan + gain_of(follow(DRAG_LEVELS, axis=2)) * grit


# Wall echo decay: (frequency [Hz], t60 [s])
WALL_DECAY = [(200, 0.37), (1000, 0.17), (4000, 0.085), (12000, 0.067)]


def walls(x):
    """Sparse echoes of random sign, each band dying at its own speed."""
    taps = np.zeros(SR // 2)
    at = np.arange(120, len(taps) - 20, 20)
    taps[at + rng.integers(0, 20, len(at))] = rng.choice([-1., 1.], len(at))
    hz, t, z = signal.stft(taps, SR, nperseg=256)
    decay = gain_of(-60 * t / read(WALL_DECAY, hz)[:, None])
    tail = signal.istft(z * decay, SR, nperseg=256)[1]
    return signal.oaconvolve(x, tail / np.linalg.norm(tail))[:N]


def scene():
    """Sums dry sources, their wall echoes and the rumble; both channels are the same."""
    knocks = stopper_pushes() - valve_knocks()
    hits = slides() + stand_tips() + knocks + drops() + single_bubbles() + drag()
    flow = jet() + spray() + gurgle() + slosh() + pipe_hum() + dribble()
    echoes = walls(gain_of(-9.5) * hits + gain_of(-14.0) * flow)
    sound = hits + gain_of(-3.0) * flow + echoes + rumble()
    return np.array([sound, sound])


# Phase difference between left and right channel: (frequency [Hz], difference [half turns])
STEREO_PHASE = [(100, 0), (1030, -.22), (1400, -.1), (1800, 0), (2900, .3), (4400, .2), (5000, 0),
                (5500, .13), (6950, 1), (8150, 1), (10400, 2), (11600, 2), (13850, 3), (14950, 3),
                (15800, 3.4)]
# Random wavering of that difference: (frequency [Hz], rms-scale factor [rad])
PHASE_WAVER = [(200, .1), (860, .9), (1400, .8), (1700, .15), (2050, .2), (2900, 1), (5200, .5),
               (6500, .55), (6950, 0), (8150, 0), (8400, .5), (10200, .5), (10400, 0), (11600, 0),
               (11800, .6), (13600, .6), (13850, 0), (14950, 0), (15200, .6)]
# Stereo balance: (frequency [Hz], left minus right [dB])
STEREO_BALANCE = [(130, 0), (400, 2), (800, .5), (1150, -1.5), (1650, 0), (3000, -.7), (5000, 0)]
DULL_HZ, DULL_DB, EDGE_HZ = 15800, -55, 17157  # steep treble limit of the sound
LOW_CUT_HZ, CEILING = 56.7, 0.85
DUCK_FROM_DB, DUCK_SHARE, RECOVER_DB_PER_S = -12.5, 0.64, 66  # recovery of the tracked power


def record(dry):
    """Stereo image with wavering phase; then low cut, gain control, soft clipping and band limit."""
    hz, t, z = signal.stft(dry, SR, nperseg=512, noverlap=384)
    chance = rng.standard_normal((len(t), len(hz))).T
    chance = evened(uniform_filter1d(uniform_filter1d(chance, size=10, axis=0), size=10, axis=1))
    phase = np.pi * read(STEREO_PHASE, hz)[:, None] + read(PHASE_WAVER, hz)[:, None] * chance
    side = np.array([1, -1])[:, None, None]
    top_db = DULL_DB * np.clip((hz - DULL_HZ) / 90 + 0.5, 0, 1)
    channel_db = side * read(STEREO_BALANCE, hz)[:, None] / 2 + top_db[:, None]
    z = z * np.exp(0.5j * side * phase) * gain_of(channel_db)
    heard = signal.istft(z, SR, nperseg=512, noverlap=384)[1][:, :N]
    heard = signal.sosfilt(signal.butter(3, LOW_CUT_HZ, "high", fs=SR, output="sos"), heard)
    power = abs(uniform_filter1d((heard ** 2).mean(0), size=600))
    power_db = 10 * np.log10(power + 1e-12)
    fall_db = np.arange(N) * RECOVER_DB_PER_S / SR
    held_db = np.maximum.accumulate(power_db + fall_db) - fall_db  # instant rise, linear fall
    over_db = np.maximum(held_db - DUCK_FROM_DB, 0)
    heard = heard / gain_of(DUCK_SHARE * uniform_filter1d(over_db, size=200))
    heard = CEILING * np.tanh(heard / CEILING)  # the input stage rounds off the tallest peaks
    band_limit = signal.firwin(511, EDGE_HZ, window=("kaiser", 9), fs=SR)
    return signal.oaconvolve(heard, band_limit[None], "same")


dry = scene()
out = record(dry)
wav_record(out)
```